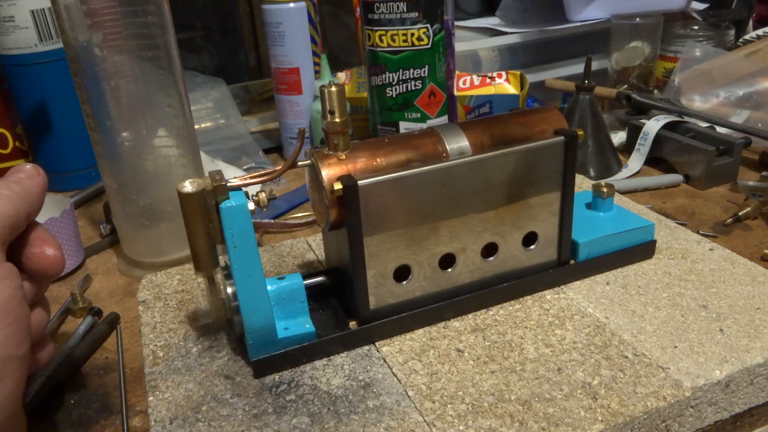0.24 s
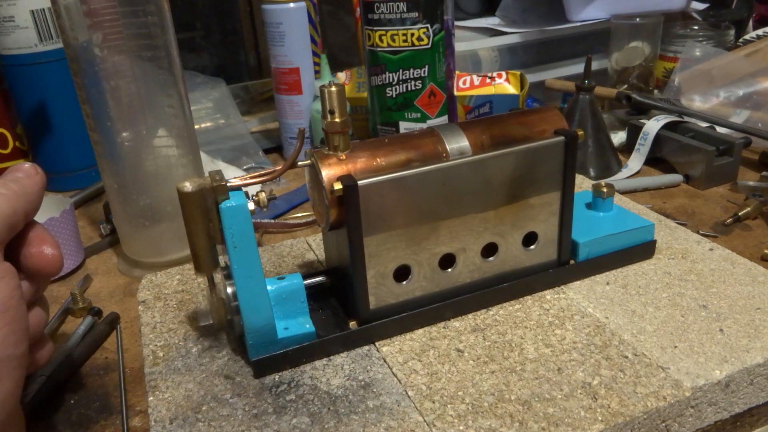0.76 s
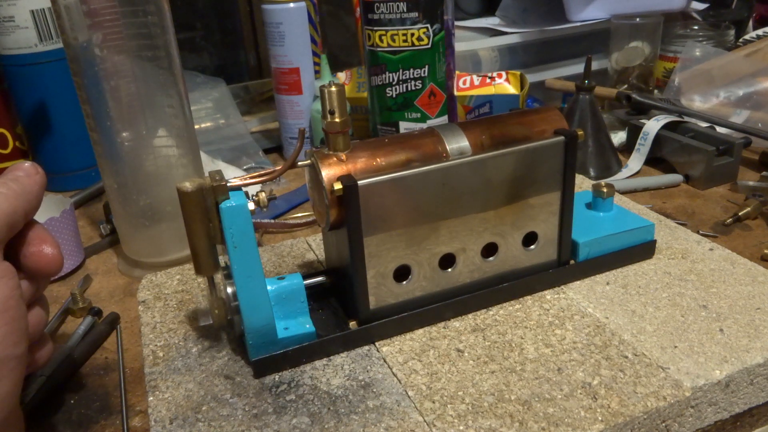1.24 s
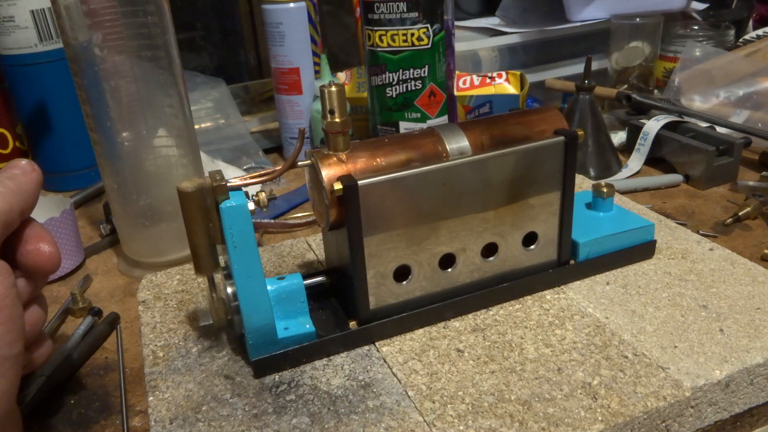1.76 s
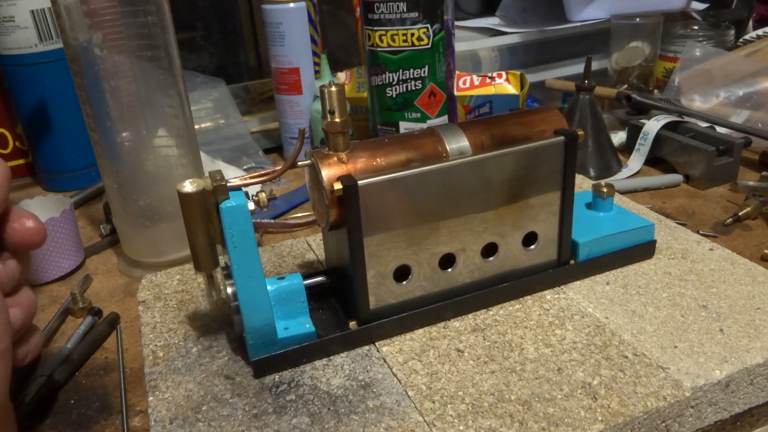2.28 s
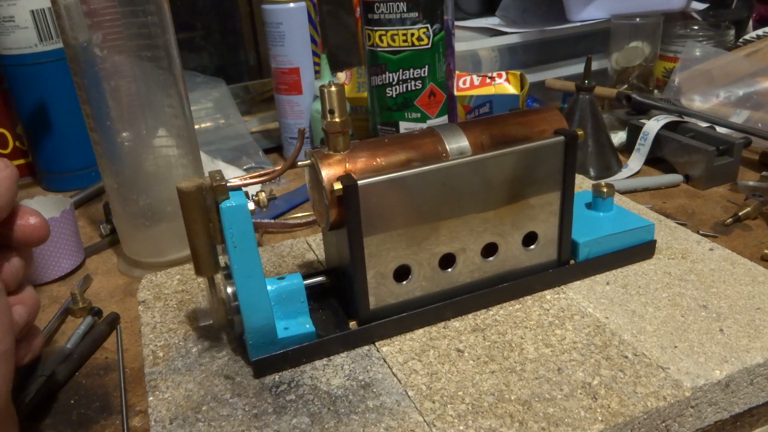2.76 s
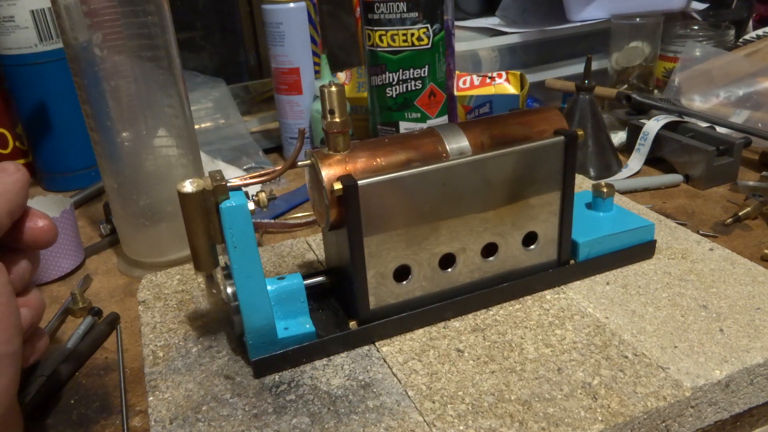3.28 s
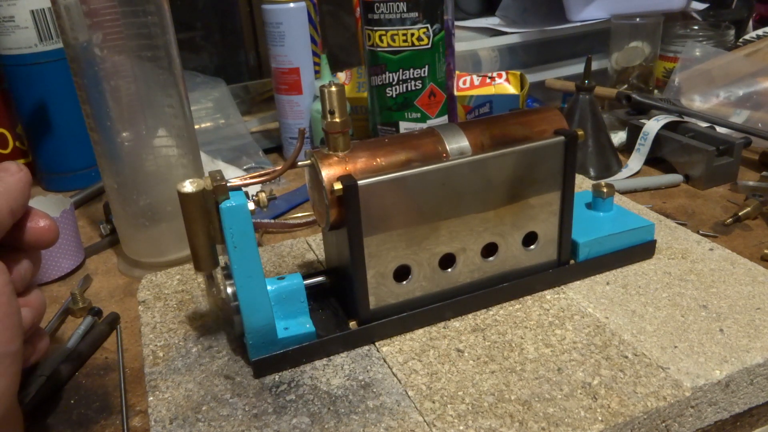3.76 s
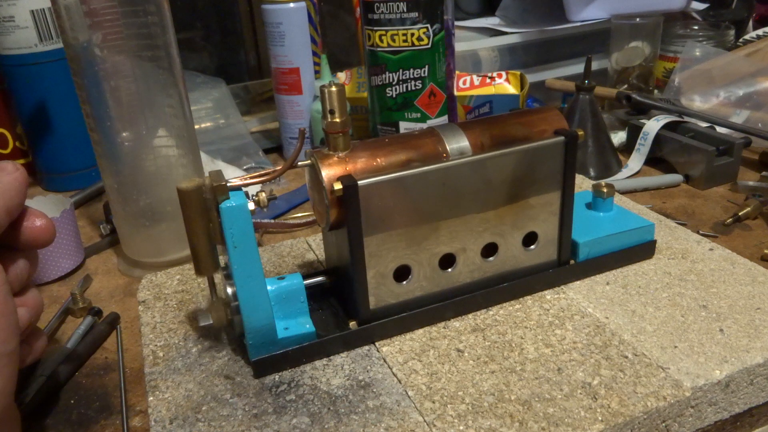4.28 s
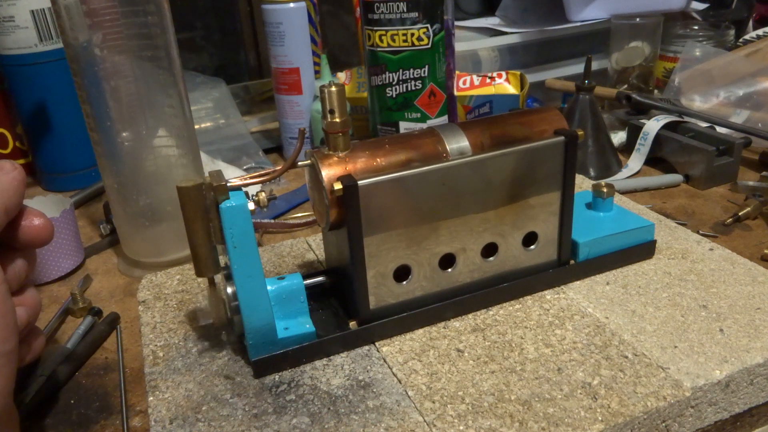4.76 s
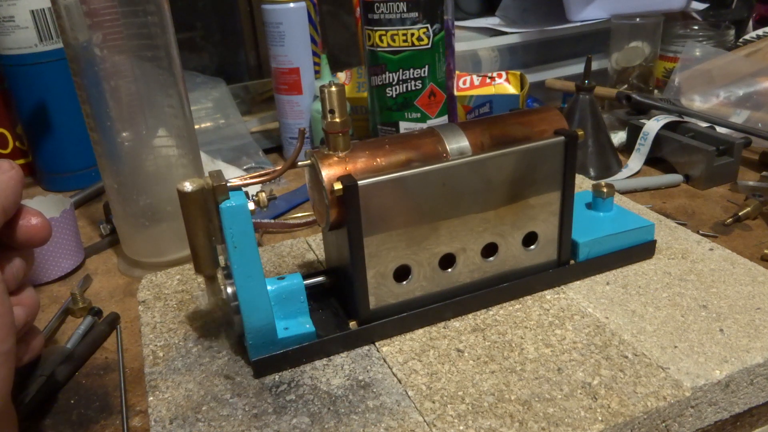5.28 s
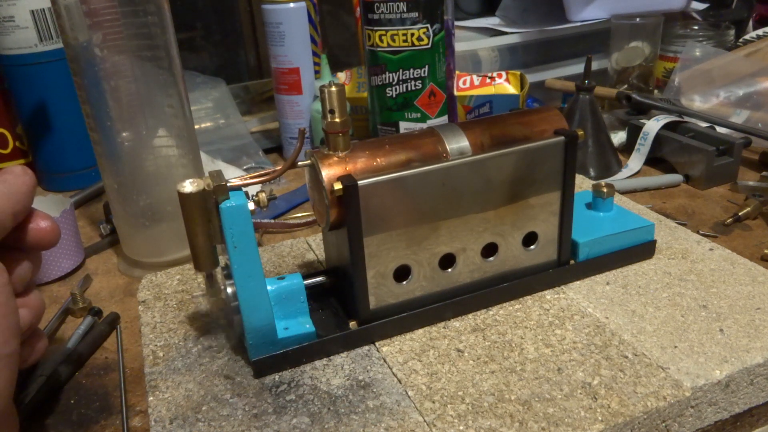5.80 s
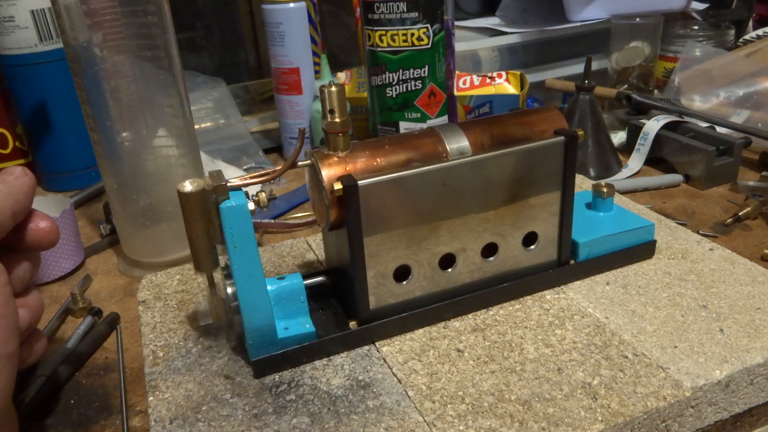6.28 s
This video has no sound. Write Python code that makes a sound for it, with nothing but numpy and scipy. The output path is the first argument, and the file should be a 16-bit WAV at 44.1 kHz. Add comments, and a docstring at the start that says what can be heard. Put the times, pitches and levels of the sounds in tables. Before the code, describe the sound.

A small model steam engine runs close by on a workbench, giving rapid, even, hissing chuffs. Water in the steam crackles, pops and spits, and the rocking cylinder adds tiny pips and squeaks. The beat gradually eases, then drops to about half speed with wetter, stronger puffs before picking up slightly. Light knocking, a low rumble and a steady sizzling leak lie underneath, in a small, dry room.

```python
"""Fast, hissing chuffs: a small single-cylinder model steam engine races on a workbench, then slows to
half speed. Every turn, steam rasps through the hollow inlet and leaves the exhaust as a jet.
Water carried over with the steam crackles in the chuffs, pops and spits. The rocking cylinder pips and
squeaks on its port face. Underneath, the crank knocks and rumbles, a bearing whines faintly and a leak
sizzles, all in a small, dry workshop."""
import sys
import numpy as np
from scipy import signal
from scipy.io import wavfile

SR = 44100
rng = np.random.default_rng(int(sys.argv[2]) if len(sys.argv) > 2 else 0)


def transcribe(u):
    """Save the signal u as a 16-bit wav file named by the first command-line argument.

    u: samples, shape (n,) or (channels, n), limited to [-1, 1]; the rate is SR.
    q: integer samples, one column per channel.
    """
    v = np.clip(np.atleast_2d(u).T, -1, 1)
    q = np.round(v * 32767).astype(np.int16)
    wavfile.write(sys.argv[1], SR, q)


N = 288414
TIME = np.arange(N) / SR

# Tone of the steam jet, its extra tilt on slow strokes, and the water's gurgle: f/Hz, level/dB
JET_TONE = [(100, -23.5), (400, -8.5), (900, -32.5), (1400, 3.5), (2100, -17), (3000, -14.5), (4000, -4.5),
            (5500, -2.5), (7300, 1), (8800, 0.5), (10200, 5.5), (11200, -4.5)]
SLOW_TILT = [(300, -3), (1500, -7), (4000, -2.5), (7000, 2), (10500, 3.5)]
GURGLE_TONE = [(100, -19.5), (400, -5), (650, -9.5), (900, -21.5), (1300, -13), (2050, -5), (2900, 1.5),
               (3800, -7), (6000, -3), (11000, -17.5)]
def exhaust(puffs, jet_db=0.5, spray_db=-4, flutter_db=2.5, gurgle_db=-1, hollow_db=-13):
    """Each chuff is a jet of steam with fine spray; coarser water gurgles on a little longer."""
    jet = shaped(noise() + amp(spray_db) * droplets(rate=2500, spread_db=0.5), JET_TONE)
    slow = slowness()
    jet = evened((1 - slow) * jet + slow * shaped(jet, SLOW_TILT))
    jet *= amp(jet_db + flutter_db * wander(350)) * outflow(puffs, stretch=0.95, wet=False)
    drops = droplets(rate=900, spread_db=1.5) + 0.4 * noise()
    hollow = resonate(drops, follow(PIP), width=330)  # the cylinder rings at its pip pitch
    gurgle = shaped(drops, GURGLE_TONE) + amp(hollow_db) * hollow
    return jet + amp(gurgle_db) * gurgle * outflow(puffs, stretch=1.174, wet=True)


# Envelope of one chuff: t/chuff spans, racing level/dB, crawling level/dB
CHUFF_ENVELOPE = [(-.15, -45, -63), (-.03, -18, -4.5), (.08, 1, -5), (.25, 0, 4), (.5, 2.5, 2),
                  (.72, -1, -1.5), (.95, -2.5, -2), (1.2, -6, -3), (1.5, -11, -19.5), (2.1, -31, -29)]
def outflow(puffs, stretch, wet):
    """Strength of the flow from the exhaust port; if wet, weighted by the water in each chuff."""
    at, fast_db, slow_db = np.transpose(CHUFF_ENVELOPE)
    surge = np.interp(at, [.45, .7, 1.1, 1.5], [-0.65, 0.2, 0.2, -0.23])  # water holds back some steam
    flow = np.zeros(N)
    for s, length, slow, db, wet_db, surge_db in puffs:
        span = length * stretch
        progress = np.arange(at[0], at[-1], 1 / (span * SR))
        shape_db = fast_db + (slow_db - fast_db) * slow + surge_db * surge
        add(flow, s + at[0] * span, amp(db + wet * wet_db + np.interp(progress, at, shape_db)))
    return flow


# Weight of the chuffs as the steam pressure rises and falls: t/s, level/dB
CHUFF_LEVEL = [(0, -32.5), (.7, -33.5), (2.5, -32), (3.8, -31), (4.45, -31), (4.7, -27), (5.3, -27.5),
               (5.8, -28), (6.5, -30.5)]
# Water in the exhaust: t/s, level against the steam/dB
WETNESS = [(0, -6.5), (.75, -4.5), (1.4, -5), (2.3, -6.5), (3, -3.5), (3.5, -8.5), (4, -3), (4.65, -3.5),
           (4.9, -12), (5.2, -5.5), (5.5, -13), (5.9, -9), (6.5, -8.5)]
# Plugs of water hold a chuff back, then let it burst out: t/s, delay/s, length/ratio, boost/dB
PLUGS = [(4, 0.031, 0.69, 0.5), (4.09, 0.0065, 0.95, 1.5), (4.29, .001, 1.1, 2.5)]
def chuffs(racing_turns=.31, crawling_turns=.37, surge_db=2.3):
    """One chuff a turn, no two alike: t/s, length/s, slowness, level/dB, wetness/dB, surge/dB."""
    s, period, slow = strokes().T
    length_scatter, level_scatter, wet_scatter, surge_scatter = rng.standard_normal((len(s), 4)).T
    share = racing_turns + (crawling_turns - racing_turns) * slow
    length = period * share * np.exp(.04 * length_scatter)
    db = follow(CHUFF_LEVEL, at=s) + .5 * level_scatter
    for at, delay, ratio, boost_db in PLUGS:
        k = np.argmin(abs(s - at))
        s[k] += delay
        length[k] *= ratio
        db[k] += boost_db
        slow[k] = 0  # opens as suddenly as when racing
    wetness = follow(WETNESS, at=s) + 2 * wet_scatter
    surge = surge_db + 2 * surge_scatter  # a second swell, as the piston pushes out the rest
    return np.transpose([s, length, slow, db, wetness, surge])


# Tempo of the crank, dragged down as water reaches the cylinder: t/s, speed/(turns a second)
SPEED = [(0.0, 16.14), (1.4, 16.31), (1.6, 15.38), (1.85, 15.09), (2.45, 13.27), (2.75, 13.36),
         (3.1, 12.68), (3.6, 12.37), (3.9, 12.4), (4.25, 9.27), (4.75, 7.35), (5.45, 7.11), (5.8, 7.56),
         (6.5, 8.2)]
FIRST_TURN_S = -.0052
def strokes():
    """The beat, one row a turn: t/s when the exhaust opens, length of the turn/s, slowness."""
    turns = np.cumsum(follow(SPEED)) / SR
    s = FIRST_TURN_S + np.interp(np.arange(int(turns[-1]) + 1), turns, TIME)
    return np.transpose([s, 1 / follow(SPEED, at=s), slowness(s)])


def slowness(at=TIME, racing_hz=16.2, crawling_hz=7.2):
    """0 when the engine races, 1 when it crawls."""
    return np.clip((racing_hz - follow(SPEED, at=at)) / (racing_hz - crawling_hz), 0, 1)


def crank_angle():
    """Turns made so far."""
    return np.cumsum(follow(SPEED)) / SR - FIRST_TURN_S * SPEED[0][1]


# Level ride of the rasp: t/s, level/dB
RASP_LEVEL = [(0, -34), (1, -32.5), (1.4, -30), (3, -29.5), (4, -31.5), (4.5, -30.5), (5, -33),
              (6.5, -28.5)]
# Hollow resonances of the inlet passage: f/Hz, width/Hz, level/dB
INLET_MODES = [(1509, 250, -3), (3110, 520, -10.5), (4620, 260, -3.5), (5410, 350, -4.5), (5980, 400, -4.5),
               (6830, 690, -9)]
def inlet(trim_db=-1.5, lead_turns=0.11, slow_extra_turns=0.032, rise_s=0.0052, fall_s=0.0058):
    """Steam rasps through the inlet passage about an eighth of a turn before each chuff."""
    gate, t = np.zeros(N), np.arange(-SR // 20, SR // 20) / SR
    opening = np.exp(-abs(t) / np.where(t < 0, rise_s, fall_s))
    for s, period, slow in strokes():
        add(gate, s - (lead_turns + slow_extra_turns * slow) * period + t[0], opening)
    passage = evened(sum(amp(db) * resonate(noise(), hz, width) for hz, width, db in INLET_MODES))
    return amp(trim_db + follow(RASP_LEVEL)) * gate * passage


# Water plugs popping at the outlet: t/s, level/dB, f/Hz
POPS = [(0.1404, -22.5, 2980), (0.9415, -22, 2830), (0.9587, -23, 2870), (0.9638, -20, 2900),
        (1.0119, -17.5, 2830), (1.689, -25.5, 2880), (2.833, -32, 2890), (3.3337, -26, 2860),
        (3.4954, -22.5, 3020), (3.6426, -18.5, 3060), (4.0572, -20, 2920), (4.1423, -19.5, 3000),
        (4.251, -23, 2950), (4.2586, -15.5, 2980), (4.359, -24, 2480), (4.3673, -22.5, 2900),
        (4.4724, -28, 2880), (4.5895, -20, 2760), (4.6007, -23.5, 2900), (4.7182, -24, 2920),
        (4.7356, -22.5, 2880), (5.287, -27, 2900), (5.9554, -18.5, 2960), (5.9612, -18, 3020)]
# Spray squeezed through the port: t/s, level/dB, f/Hz, width/Hz, half length/s
SPITS = [(1.047, -27, 10100, 1600, 0.0015), (1.735, -24, 10500, 1600, 0.0014),
         (3.441, -25.5, 10350, 2000, 0.0028), (4.046, -27, 5800, 2930, 0.0038),
         (4.047, -24, 2800, 1500, 0.0035), (4.218, -16.5, 9100, 2500, 0.002),
         (4.252, -26, 2960, 2800, 0.0084), (4.298, -15, 9800, 1400, 0.0011), (4.303, -18, 9600, 1600, .002),
         (4.36, -26.5, 2710, 3000, .004), (4.421, -36, 7500, 3000, 0.0013),
         (4.947, -27.5, 5500, 1580, 0.0058), (4.976, -21, 10800, 1600, 0.0023),
         (5.085, -21, 5660, 1600, 0.0066), (5.112, -25, 9400, 3000, 0.0017),
         (5.361, -22, 5850, 1630, 0.0041), (5.502, -25, 5560, 1200, 0.0058),
         (5.532, -18.5, 10270, 1390, 0.0031), (5.632, -21, 9900, 1520, 0.0028),
         (6.527, -21, 9800, 1600, 0.0038)]
def water(puffs, pop_trim_db=2, dribble_db=-37, spit_trim_db=-2):
    """Large pops and spits, and small pops as the piston pushes out the dregs of each stroke."""
    out = np.zeros(N)
    for s, db, hz in POPS:
        add(out, s, amp(db + pop_trim_db) * pop(hz))
    for s, length, *_ in puffs:
        for when, size, pitch in rng.standard_normal((3, 3)):
            dribble = amp(dribble_db + 3 * min(size, 1.5)) * pop(2900 + 300 * pitch)
            add(out, s + length + .012 + .009 * when, dribble)
    for s, db, hz, width, half in SPITS:
        t = np.arange(-2 * half, 2 * half, 1 / SR)
        spray = resonate(rng.standard_normal(len(t)), hz, width)
        add(out, s + t[0], amp(db + spit_trim_db) * spray * np.exp(-2 * (t / half) ** 2))
    return out


def pop(hz, t60=0.0028, ring_db=-16, ring_t60=0.024, snap_db=-9, snap_s=0.0013):
    """A film of water bursts: a snap, a few strong cycles, and a faint ring of the pipe."""
    t = np.arange(SR // 30) / SR
    cavity = np.sin(2 * np.pi * hz * t) * (amp(-60 * t / t60) + amp(ring_db - 60 * t / ring_t60))
    burst = cavity + amp(snap_db) * np.exp(-t / snap_s) * rng.standard_normal(len(t))
    return signal.lfilter(*signal.butter(2, 1400, "high", fs=SR), burst)  # too small to radiate bass


# Stick-slip pip of the cylinder: t/s, f/Hz, level/dB
PIP = [(0, 1663, -32), (1.1, 1712, -35), (1.8, 1624, -30), (2.15, 1514, -24), (2.6, 1528, -36),
       (4, 1545, -40.5), (5.3, 1543, -33.5), (6, 1567, -50), (6.5, 1556, -32)]
# Squeak on the return swing: t/s, level/dB
SQUEAK_LEVEL = [(0, -31), (.6, -33.5), (1.25, -33.5), (1.35, -40.5), (3.2, -44.5), (4.6, -42)]
def pivot(lead_s=0.00303, slow_extra_s=0.018, slip_db=-3, slip_gap_s=0.00414, squeak_trim_db=-0.5):
    """The rocking cylinder slips twice a turn on its port face and squeaks back, loudest when racing."""
    out = np.zeros(N)
    for s, _, slow in strokes():
        hz, size = follow(PIP, at=s), amp(follow(PIP, column=2, at=s))
        early = lead_s + slow_extra_s * slow
        start = s - 1 / 50  # a chirp started here peaks as the exhaust opens
        slip = amp(slip_db) * chirp(hz, rise_s=0.001, fall_s=0.0027)
        add(out, start - early - slip_gap_s, size * slip)
        drag_s = 0.29 * max(early - .008, 0)  # a slow piston drags the pip out
        add(out, start - early, size * chirp(hz, rise_s=0.0016 + drag_s, fall_s=0.0031, glide=0.044))
        squeak = chirp(1718, rise_s=0.0026, fall_s=.011)
        squeak += amp(2) * chirp(3215, rise_s=0.001, fall_s=0.0029)  # overtone
        add(out, start + 0.0059, amp(follow(SQUEAK_LEVEL, at=s) + squeak_trim_db) * squeak)
    return out


def chirp(hz, rise_s, fall_s, glide=0, glide_s=0.0049):
    """A brief tone that swells to its peak 20 ms in and rings away; it may glide up through the peak."""
    t = np.arange(-SR // 50, SR // 20) / SR
    swell = np.where(t < 0, np.exp(-(t / rise_s) ** 2), np.exp(-abs(t) / fall_s))
    pitch = hz * (1 + 0.0058 * rng.standard_normal() + glide * np.tanh(t / glide_s))
    return swell * np.sin(2 * np.pi * (np.cumsum(pitch) / SR + rng.random()))


# Knock pattern of one turn: t/s after the exhaust opens, level/dB
KNOCK_PATTERN = [(-.001, -2), (.009, 5), (.023, -1.5)]
# Level ride of the knocks: t/s, level/dB
KNOCK_LEVEL = [(0, -43.5), (.95, -51), (1.1, -41), (1.26, -43), (1.35, -52), (2.2, -53.5), (3.2, -48),
               (5.3, -56), (6.2, -47.5)]
# Ring of the base plate: f/Hz, level/dB, t60/s
PLATE_MODES = [(406, -17, 0.038), (444, 5.5, 0.035), (512, 0.5, 0.061), (604, -6.5, 0.021)]
def crank_knocks(trim_db=3, attack_s=0.0028, jitter_s=0.00036, scatter_db=2):
    """Play in the crank is taken up three times a turn, knocking on the base plate."""
    knocks, t = np.zeros(N), np.arange(SR // 20) / SR
    plate = sum(amp(db - 60 * t / t60) * np.sin(2 * np.pi * hz * t) for hz, db, t60 in PLATE_MODES)
    plate *= 1 - np.exp(-t / attack_s)
    for s, *_ in strokes():
        for after, db in KNOCK_PATTERN:
            late, size = rng.standard_normal(2)
            add(knocks, s + after + jitter_s * late, amp(trim_db + db + scatter_db * size) * plate)
    return amp(follow(KNOCK_LEVEL)) * knocks


# Wavering hum of the base on the bench: t/s, level/dB, f/Hz
HUM = [(0, -59, 157), (1.3, -60.5, 148), (1.9, -54, 164.5), (2.3, -54, 153), (2.8, -56, 168),
       (3.4, -56.5, 168.3), (4.1, -60.5, 159.5), (6.5, -61.5, 160)]
# Tone of the rumble: f/Hz, level/dB
RUMBLE_TONE = [(20, -24), (45, -34), (65, 0.5), (95, -9), (130, -1), (220, -1), (320, 1), (420, 0.5),
               (520, -3), (720, -6.5), (880, -21.5), (1300, -18.5), (2200, -26), (8000, -53)]
def crank_rumble(loose_db=1.5, racing_db=-50, slow_change_db=-5):
    """The bearings hum and rumble through the bench; the rumble eases as the engine slows."""
    hum = resonate(bearing() + 0.95 * noise(), follow(HUM, column=2), width=78)
    rumble = shaped(bearing() + amp(loose_db) * noise(), RUMBLE_TONE)
    return amp(follow(HUM)) * hum + amp(racing_db + slow_change_db * slowness()) * rumble


def bearing(spots=1024):
    """The same rough spots of a bearing come round on every turn."""
    roughness = rng.standard_normal(spots)
    return evened(np.interp(crank_angle() * spots, np.arange(spots), roughness, period=spots))


# Tone of the leak: f/Hz, level/dB
LEAK_TONE = [(100, -29), (900, -10.5), (1400, -1), (2100, -0.5), (3000, 0.5), (4000, -0.5), (6000, 0),
             (9000, 2.5), (11000, -1.5)]
# Level ride of the leak: t/s, level/dB
LEAK_LEVEL = [(0, -44.5), (1.2, -46), (2.4, -45), (3.6, -44.5), (4.6, -46), (6.5, -47.5)]
def leak(sizzle_db=-3):
    """Wet steam sizzles steadily from the port face."""
    sizzle = noise() + amp(sizzle_db) * droplets(rate=580, spread_db=4)
    return amp(follow(LEAK_LEVEL)) * shaped(sizzle, LEAK_TONE)


# Swells of bearing whine: peak t/s, half length/s, pitch/crank speed, level/dB
WHINES = [(.45, 0.56, 16, -58.5), (1.52, 0.3, 24, -55), (2.002, 0.23, 37, -57)]
def whine(roughness=0.22):
    """A bearing sings faintly and briefly at multiples of the crank speed."""
    out, angle = np.zeros(N), crank_angle()
    for s, half, multiple, db in WHINES:
        swell = amp(db) * np.exp(-((TIME - s) / half) ** 2)
        out += swell * (1 + roughness * wander(39.84)) * np.sin(2 * np.pi * multiple * angle)
    return out


# Peaks and dips from reflections off the bench: f/Hz, width/Hz, gain/dB
BENCH_COLOUR = [(181.6, 26, 3), (251.5, 18.4, 8), (390, 34, 4.5), (500, 62, 0.5), (1177, 167, 10.5),
                (1606, 21, 3), (1616, 54, -15), (1810, 59, 4.5), (1960, 37, 3.5), (2200, 26, 8),
                (2904, 270, 6), (3293, 55, -11.5), (3394, 174, 3), (3730, 330, 3), (5710, 1100, 1.5),
                (6500, 130, -3.5), (7150, 160, 7), (7700, 110, 0.5), (7850, 140, 2.5), (8200, 26, 3),
                (8550, 64, 9), (8790, 340, -4.5), (9300, 70, 8), (9270, 390, -4.5), (10100, 310, 0),
                (10820, 140, 4.5), (10730, 105, 5.5)]
def bench_colour(x):
    """Fixed peaks and dips from reflections off the bench colour every sound of the engine."""
    return colour(x, lambda f: sum(db / (1 + (2 * (f - hz) / width) ** 4)
                                   for hz, width, db in BENCH_COLOUR))


# Early reflections off the bench clutter: t/s, gain/ratio
ECHOES = [(.0012, 0.34), (.0021, 0.074), (.0031, 0.17), (.0066, 0.065)]
# Decay of the room: f/Hz, t60/s
ROOM_DECAY = [(100, 0.83), (1000, 0.39), (4000, 0.12), (11000, 0.15)]
# Tone of the room's tail: f/Hz, level/dB
ROOM_TONE = [(100, -12.5), (550, -3), (1500, -5.5), (3000, -12.5), (6000, -10), (10000, -13)]
def workshop(x):
    """Close echoes off the bench, then a short diffuse tail that differs on each side."""
    near = x.copy()
    for s, strength in ECHOES:
        add(near, s, strength * x)
    hz, t, bands = signal.stft(rng.standard_normal((2, SR // 2)), SR, nperseg=256)
    t60 = read(ROOM_DECAY, hz)[:, None]
    unit_energy = np.sqrt(2 * np.log(1000) / (t60 * SR))
    bands *= amp(read(ROOM_TONE, hz)[:, None] - 60 * t / t60) * unit_energy
    tail = signal.istft(bands, SR, nperseg=256)[1]
    tail = np.pad(tail, ((0, 0), (SR // 400, 0)))  # pre-delay
    return near + signal.fftconvolve(x[None], tail, axes=1)[:, :N]


def amp(db):
    return 10 ** (np.asarray(db) / 20)


def evened(x):
    """Scales x to unit RMS level."""
    return x / np.sqrt(np.mean(x ** 2) + 1e-20)


def read(points, hz):
    """A spectrum, joined by straight lines over log frequency."""
    f, value = np.transpose(points)
    return np.interp(np.log(hz + 1), np.log(f + 1), value)


def follow(table, column=1, at=TIME):
    """One column of a curve, at every sample or at given times."""
    table = np.array(table)
    return np.interp(at, table[:, 0], table[:, column])


def add(mix, s, sound):
    """Adds a sound at time s."""
    start = round(s * SR)
    sound = sound[max(-start, 0):]
    part = mix[max(start, 0):][:len(sound)]
    part += sound[:len(part)]


def colour(x, curve, size=4096):
    """Causal filter whose gain in dB is curve(Hz)."""
    log_gain = np.log(amp(curve(abs(np.fft.fftfreq(size, 1 / SR)))))
    taps = np.fft.ifft(np.exp(np.conj(signal.hilbert(log_gain)))).real
    return signal.oaconvolve(x, taps[:size // 2])[:len(x)]


def shaped(x, spectrum):
    """Gives x a spectrum and unit level."""
    return evened(colour(x, lambda hz: read(spectrum, hz)))


def resonate(x, hz, width):
    """A steep resonance at hz, steady or moving; unit level."""
    turn = np.exp(2j * np.pi * np.cumsum(hz * np.ones(len(x))) / SR)
    pole = np.exp(-np.pi * width / SR)
    return evened((turn * signal.lfilter([1], np.poly([pole, pole]), x / turn)).real)


def noise():
    return rng.standard_normal(N)


def wander(rate):
    """A random drift through rate new values a second."""
    return np.interp(TIME * rate, np.arange(N), noise())


def droplets(rate, spread_db):
    """Random clicks of uneven size, about rate a second."""
    sizes = amp(spread_db * np.clip(noise(), -2, 2)) * np.sign(noise())
    return evened(sizes * (rng.random(N) < rate / SR))


def scene():
    """Steam, water and moving parts, coloured by the bench, sound in the workshop."""
    puffs = chuffs()
    foreground = exhaust(puffs) + inlet() + pivot() + water(puffs)
    background = crank_knocks() + crank_rumble() + whine() + leak()
    return workshop(bench_colour(foreground + background))


# Stereo lean: f/Hz, left minus right/dB
BALANCE = [(100, -0.5), (600, 1.3), (1200, -1), (2500, 0.5), (5000, 0.6), (10000, 1.5)]
def record(dry, cutoff_hz=11120):
    """Left and right differ a little in colour; a steep low-pass takes off the top."""
    left = colour(dry[0], lambda hz: read(BALANCE, hz) / 2)
    right = colour(dry[1], lambda hz: -read(BALANCE, hz) / 2)
    lowpass = signal.firwin(601, cutoff_hz, window=("kaiser", 8), fs=SR)
    return signal.oaconvolve(np.array([left, right]), lowpass[None], "same", axes=1)


dry = scene()
out = record(dry)
transcribe(out)
```